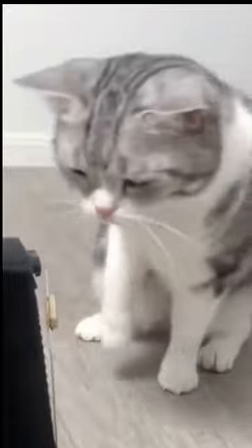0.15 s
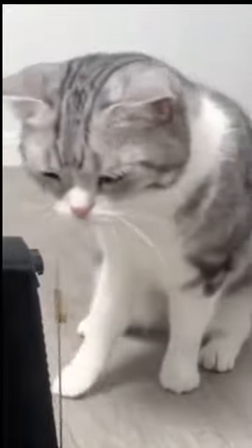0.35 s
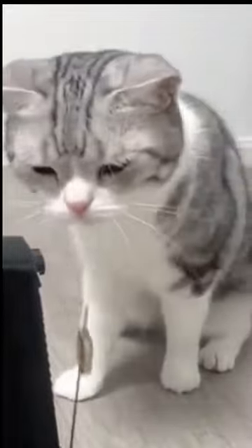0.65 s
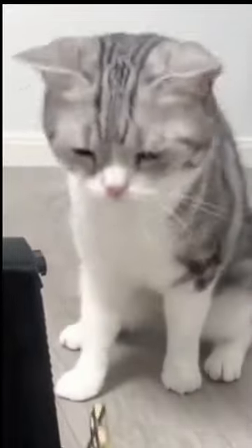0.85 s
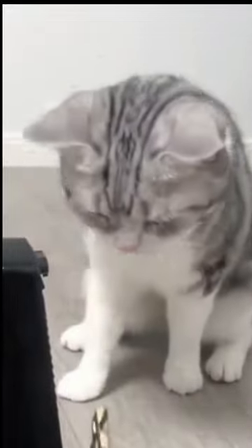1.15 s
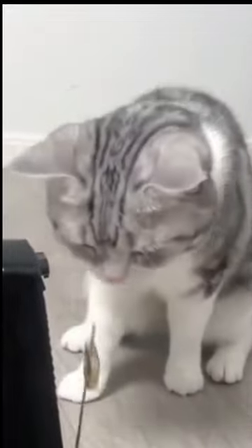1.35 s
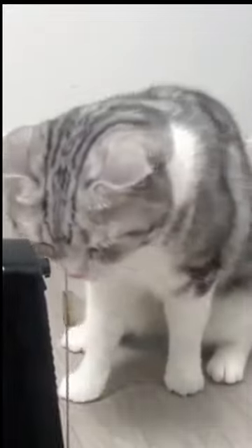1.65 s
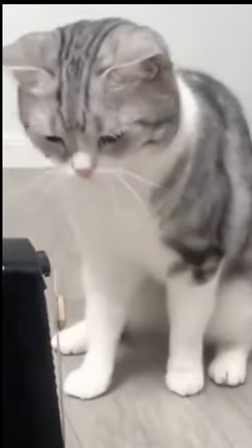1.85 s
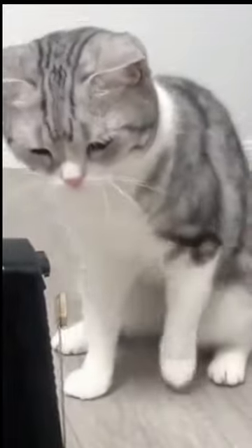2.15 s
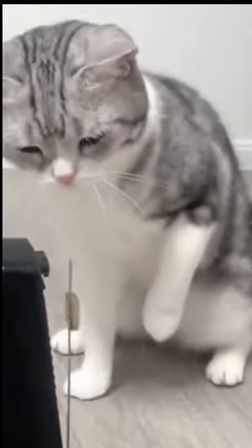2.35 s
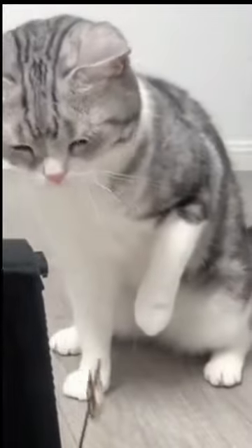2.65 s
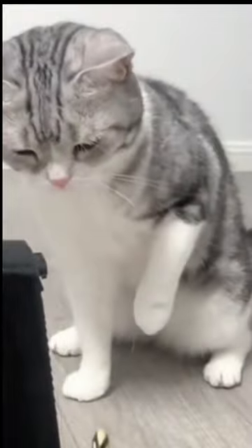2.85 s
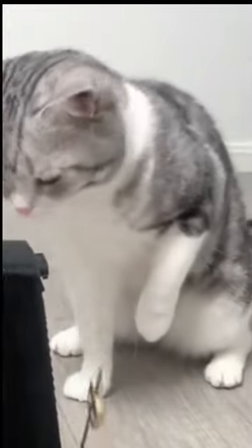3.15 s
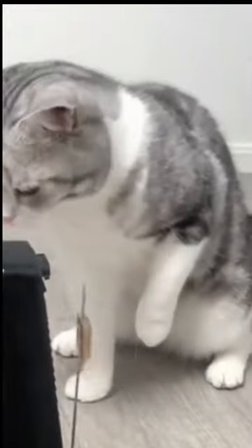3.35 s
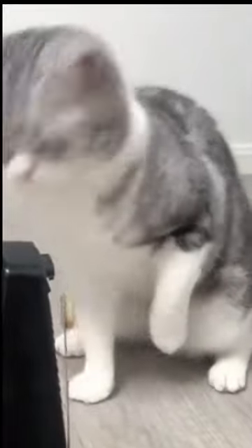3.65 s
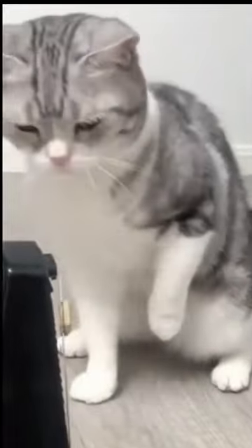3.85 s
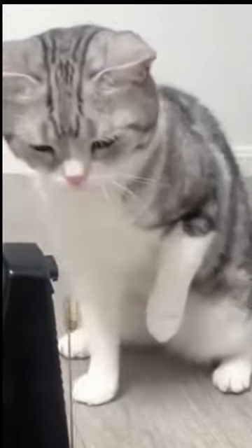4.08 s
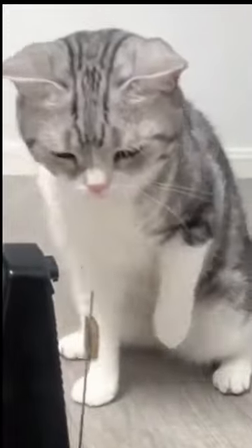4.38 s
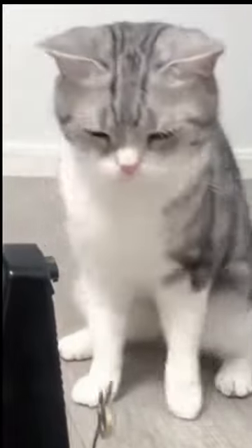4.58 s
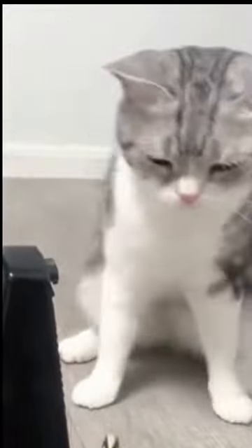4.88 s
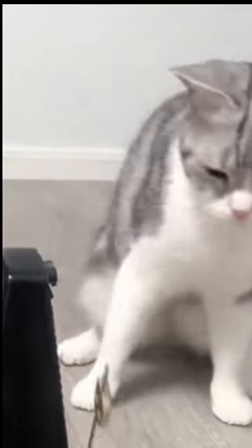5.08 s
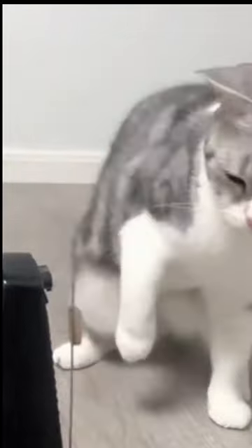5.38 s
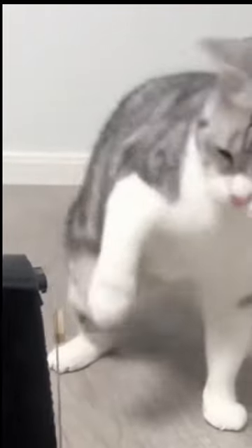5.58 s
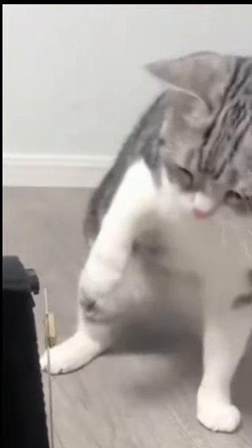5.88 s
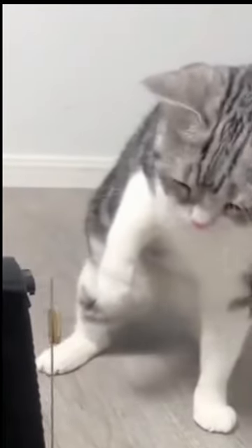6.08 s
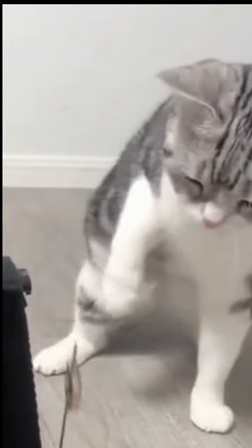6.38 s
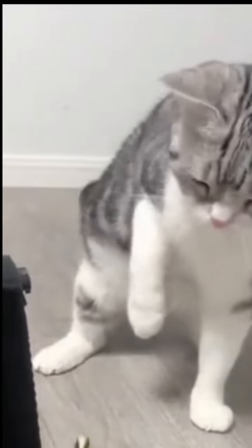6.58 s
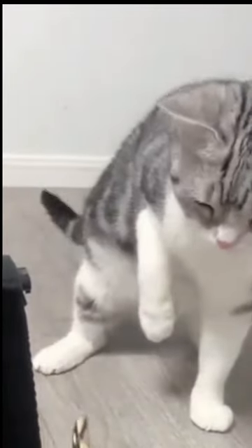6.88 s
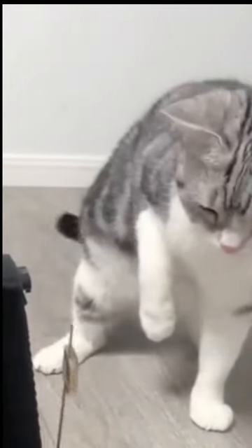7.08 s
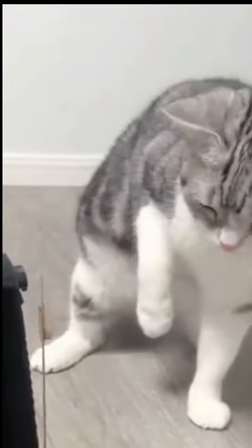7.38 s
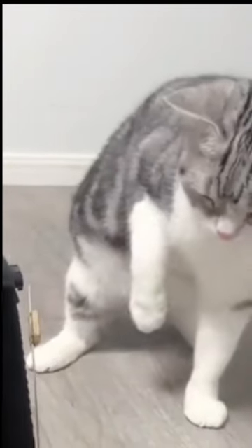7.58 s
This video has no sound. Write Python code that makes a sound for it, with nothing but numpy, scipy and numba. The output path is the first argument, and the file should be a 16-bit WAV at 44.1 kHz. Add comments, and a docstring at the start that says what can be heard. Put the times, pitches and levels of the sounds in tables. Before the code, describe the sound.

A mechanical metronome clacks slowly, about one beat per second, very close in a small hard room, with low drone and thin buzz swelling between beats.

```python
"""In a small hard room, a mechanical metronome ticks on the floor, very close to a phone.
Each beat is a short slide, a noisy crack, a knock of ringing case tones and a room echo; brightness varies.
The phone's gain control ducks after each beat, then lets low drone, air noise and a thin buzz swell back.
A cat beside it shifts its paws now and then, as soft dull bursts of noise, and one faint tap is heard."""
import sys
import numpy as np
from scipy import signal
from scipy.fft import rfft, irfft, next_fast_len
from scipy.io import wavfile
from scipy.ndimage import uniform_filter1d
from numba import njit

SR = 44100
rng = np.random.default_rng(int(sys.argv[2]) if len(sys.argv) > 2 else 0)


def master(y):
    """Save y as 16-bit WAV."""
    cut = np.clip(np.atleast_2d(y).T, -1, 1)
    pcm = np.round(cut * 32767)  # scale
    wavfile.write(sys.argv[1], SR, pcm.astype(np.int16))


N = 340893  # length of the scene in samples
AFTER = np.arange(SR) / SR  # the second that follows a blow, in seconds

# The colour of the escapement's noise. Each row: frequency in Hz, relative level in dB per Hz.
CRACK_COLOUR = [(300, -4), (1000, -23), (2800, -4.5), (3700, 10.5), (4800, 0.5), (6800, 3.5), (8200, -4),
                (11500, -1), (15500, -6.5)]


def undb(db):
    """Turn decibels into a gain."""
    return 10 ** (np.asarray(db) / 20)


def unit(x):
    """Scale a sound to a standard deviation of 1."""
    return x / np.std(x)


def along(points, hz):
    """Read a value between (Hz, value) points, on a logarithmic frequency axis."""
    point_hz, value = np.transpose(points)
    return np.interp(np.log(hz + 1e-3), np.log(point_hz), value)


def noise(colour, size):
    """Coloured noise: random samples whose frequencies are weighted, scaled to level 1."""
    hz = np.fft.rfftfreq(size, 1 / SR)
    spectrum = rfft(rng.standard_normal(size)) * undb(along(colour, hz))
    return unit(irfft(spectrum, size))


def resonate(x, hz, width):
    """A two-pole resonance, with gain 1 at its centre."""
    b, a = signal.iirpeak(min(hz, 0.45 * SR), hz / width, fs=SR)
    return signal.lfilter(b, a, x)


def treble(x, edge_hz, order):
    """Keep what lies above the edge."""
    return signal.sosfilt(signal.butter(order, edge_hz, "high", fs=SR, output="sos"), x)


def fade(t60):
    """Exponential decay after a blow, falling 60 dB in t60 seconds."""
    return np.exp(-np.log(1000) * AFTER / t60)


def swell(peak_s, sharpness):
    """The envelope of a vibration that builds up to 1 and dies away."""
    u = AFTER / peak_s
    return (u * np.exp(1 - u)) ** sharpness


def add(out, s, x):
    """Mix x into out from time s in seconds."""
    i = max(int(s * SR), 0)
    out[i:i + len(x)] += x[:len(out) - i]


def waver(per_s):
    """Slow chance of spread 1: random levels, each gliding into the next."""
    hold = int(SR / max(per_s, 0.5))
    levels = np.repeat(rng.standard_normal(N // hold + 1), hold)
    return unit(uniform_filter1d(levels, hold)[:N])


def drone(level_db=-23, waver_db=0.36, waver_per_s=3.04, steadiness=0.55):
    """Low room resonances, kept going by some distant machine; they waver less than free noise would."""
    # Each row: frequency in Hz, half the width of each filter in Hz, relative level in dB.
    low_bands = [(70.2, 2.7, -2), (100.4, 7.9, -6.5), (198.7, 7.7, -9.5)]
    out = 0
    for hz, half_width, db in low_bands:
        once = resonate(rng.standard_normal(N), hz, 2 * half_width)
        band = unit(resonate(once, hz, 2 * half_width))
        envelope = np.abs(signal.hilbert(band, next_fast_len(N))[:N])
        steadied = band / (envelope + 0.1) ** min(steadiness, 1)  # evens out the swells
        out = out + undb(db) * unit(steadied)
    return unit(out) * undb(level_db + waver_db * waver(waver_per_s))


def buzz(rate_hz=200, buzz_db=-35.0, uneven_db=2.5):
    """Electrical buzz: strictly timed little spikes of uneven size excite several resonances."""
    # Each row: frequency in Hz, width in Hz, relative level in dB.
    peaks = [(2340, 260, 4.5), (2865, 380, 6), (3970, 256, 2.5), (5640, 1000, -13), (7270, 243, 1),
             (14000, 3500, -26)]
    at = np.arange(0, N - 2, SR / rate_hz)
    size = undb(uneven_db * rng.standard_normal(len(at)))
    spikes = np.zeros(2 * N)  # twice the sample rate places them more finely
    spikes[np.round(2 * at).astype(int)] = size
    spikes = signal.resample_poly(spikes, 1, 2)
    ringing = sum(undb(db) * resonate(spikes, hz, width) for hz, width, db in peaks)
    return undb(buzz_db) * unit(ringing)


def air(air_db=-21):
    """Air noise: a steady random hiss and rumble."""
    # Each row: frequency in Hz, relative level in dB per Hz.
    air_colour = [(25, -35), (36, -8), (46, 2), (140, 6), (175, 0.5), (270, 1), (420, -3), (700, 0.5),
                  (1250, -1.5), (2000, -12), (4300, -21.5), (4600, -24.5), (9000, -29), (9600, -33.5),
                  (15500, -33.5)]
    return undb(air_db) * noise(air_colour, size=N)


def shuffles(relative_width=1.1):
    """The cat's paws and fur brush the floor: noise swells and eases with the pressure."""
    # Each row: middle in seconds, half length in seconds, level in dB, centre frequency in Hz.
    moves = [(0.08, .025, -21, 110), (1.95, 0.058, -19, 84), (2.823, 0.052, -26.5, 149),
             (3.798, 0.05, -22, 280)]
    # The soft, dull rubbing. Each row: frequency in Hz, relative level in dB per Hz.
    paw_colour = [(30, -23), (60, 11), (120, 5), (260, -6), (600, -6), (1500, -33), (5000, -52)]
    time = np.arange(N) / SR
    out, rubbing = np.zeros(N), noise(paw_colour, size=N)
    for s, half, db, hz in moves:
        pressure = undb(db) * np.exp(-0.5 * ((time - s) / half) ** 2)
        out += pressure * unit(resonate(rubbing, hz, relative_width * hz))
    return out


def slide(slide_db=-20, slide_t60=0.023):
    """The tooth slides off its pallet: 20 ms of noise that grows toward the blow."""
    lead = SR // 50
    growth = fade(slide_t60)[:lead][::-1]  # a decay turned backwards
    return undb(slide_db) * noise(CRACK_COLOUR, size=lead) * growth


def crack(crack_db=4, crack_t60=0.046):
    """The escapement tooth lands: a burst of noise that dies at once."""
    return undb(crack_db) * noise(CRACK_COLOUR, size=SR) * fade(crack_t60)


def knock(sharpness=2.97, case_db=3, scatter_db=2.05):
    """The case rings: small stiff parts answer at once, the hollow body late."""
    # Each row: usual frequency in Hz, usual relative level in dB, time to swell to the peak in seconds.
    case_tones = [(319, -16.5, 0.02), (362, -6, 0.015), (712.2, -3, 0.0064), (838, 0, 0.0058),
                  (1060, -4.5, 0.0071), (1216, -2, 0.0027), (1419, -1, 0.0069), (2011, 0, 0.0047),
                  (2235, -1, 0.0036), (2470, -5, 0.0023), (3436, 1, 0.0038), (3746, 1.5, 0.0036),
                  (4095, -2.5, 0.0038), (5090, -7, 0.0045), (6620, -8.5, 0.0044), (7920, -10, 0.0039),
                  (9160, -2.5, 0.00049), (11360, -1, 0.0014)]
    chance = rng.standard_normal((len(case_tones), 2))
    out = 0
    for k, ((hz, db, peak_s), (size, detune)) in enumerate(zip(case_tones, chance)):
        heard_hz = hz * (1 + 0.003 * detune)
        mode = np.sin(2 * np.pi * heard_hz * AFTER) * swell(peak_s, sharpness)
        direction = (-1) ** k  # neighbouring modes swing opposite ways
        out = out + direction * undb(case_db + db + scatter_db * size) * mode
    return out


def thump(hz=590, thump_db=8, arrives_s=0.00661, spread_s=0.0012):
    """The hollow body gives one short, deep knock just after the crack."""
    t = AFTER - arrives_s
    return undb(thump_db) * np.sin(2 * np.pi * hz * t) * np.exp(-0.5 * (t / spread_s) ** 2)


def rebound(blow, delay_s=0.0112, edge_hz=3200, first_db=-7, cluster_db=-9, cluster_t60=0.016):
    """The escapement bounces and strikes again a moment later: the bright part of the blow returns, with a
    short cluster of reflections."""
    bright = treble(blow, edge_hz, order=2)
    cluster = rng.standard_normal(SR) * fade(cluster_t60)
    scattered = signal.fftconvolve(bright, cluster / np.linalg.norm(cluster))[:SR]
    out = np.zeros(SR)
    add(out, delay_s, undb(first_db) * bright + undb(cluster_db) * scattered)
    return out


def diffuse():
    """Dense reflections as noise; each octave dies at its own rate."""
    # The colour of the reflections. Each row: frequency in Hz, relative level in dB per Hz.
    tail_colour = [(100, -91), (250, -5), (350, -2), (550, -4), (900, 0.5), (1400, -4), (1750, -5),
                   (2250, -4.5), (2950, -14), (3600, -6), (4700, -16), (7000, -18), (11500, -21.5),
                   (15500, -28)]
    # How long the room rings. Each row: frequency in Hz, time to fall by 60 dB in seconds.
    decay_times = [(150, 0.21), (400, 0.38), (1000, 0.6), (3500, 0.65), (7000, 0.46), (14000, 0.4)]
    hz = np.fft.rfftfreq(SR, 1 / SR)
    spectrum = rfft(noise(tail_colour, size=SR))
    centres = 125 * 2.0 ** np.arange(8)  # octaves, in Hz
    out = 0
    for centre, row in zip(centres, np.eye(len(centres))):
        share = np.interp(np.log(hz + 1), np.log(centres), row)  # bands overlap and add up to 1
        out = out + irfft(spectrum * share, SR) * fade(along(decay_times, centre))
    return out


def room(diffuse_db=-2, diffuse_build_s=0.0061, ring_db=-11, ring_t60=0.54, ring_build_s=0.0071):
    """The room's answer to a beat, alike every time since the metronome stays put."""
    # Lingering tones of case and room. Each row: frequency in Hz, relative level in dB.
    ring_tones = [(326, -9), (388, -5.5), (689, -3), (778, -8), (846, 2.5), (876, 0.5), (912, 2), (937, 4),
                  (1014, 4.5), (1168, 0.5), (1265, 2), (1379, 0), (1440, -1), (1585, 0), (1825, -6),
                  (2042, -4.5), (2218, -5), (2340, -8), (2800, -8.5), (3433, -6), (3452, -3.5), (4047, -7),
                  (4130, -10), (4701, -11), (6305, -17)]
    ring = sum(undb(db) * np.sin(2 * np.pi * (hz * AFTER + rng.random())) for hz, db in ring_tones)
    ring = undb(ring_db) * ring * fade(ring_t60) * (1 - np.exp(-AFTER / ring_build_s))
    return ring + undb(diffuse_db) * diffuse() * (1 - np.exp(-AFTER / diffuse_build_s))


def metronome(fresh_db=-10, bright_hz=3500):
    """Every beat: the tooth slides off its pallet, lands, and shakes case and room."""
    # Each row: start in seconds, strength in dB, treble boost in dB.
    beats = [(0.1074, 0.5, 2.5), (1.0099, 0.5, 0), (2.0028, 0, 1), (2.9070, 0.5, -0.5), (3.9052, 0.15, 1.5),
             (4.807, 2, -3), (5.8062, -0.5, 1.5), (6.7019, 1, -0.5), (7.7083, -2, -1.5)]
    out, answer = np.zeros(N), room()
    for s, db, bright_db in beats:
        before = slide()
        add(out, s - len(before) / SR, before)
        blow = knock() + crack()
        # no two blows are quite alike, so part of the reverberation is new each time
        beat = blow + thump() + rebound(blow) + answer + undb(fresh_db) * diffuse()
        # one pallet strikes harder-edged than the other
        beat = beat + (undb(bright_db) - 1) * treble(beat, bright_hz, order=1)
        add(out, s, undb(db) * beat)
    return out


def taps():
    """A small, short, high tap: resonant noise that swells and dies within milliseconds."""
    # Each row: start in seconds, frequency in Hz, width of each of two filters in Hz, level in dB.
    touches = [(2.7532, 2500, 1090, -14.5)]
    out = np.zeros(N)
    for s, hz, width, db in touches:
        once = resonate(rng.standard_normal(SR), hz, width)
        grain = unit(resonate(once, hz, width))
        add(out, s, undb(db) * grain * swell(peak_s=0.0019, sharpness=1.5))
    return out


def scene():
    """The metronome, the tap and the cat over the steady background of the room, as one channel."""
    background = drone() + buzz() + air()
    return (background + shuffles() + metronome() + taps())[None]


@njit
def follow(x, start, attack, release):
    """Level detector: climbs quickly on peaks, sinks at a steady rate in dB."""
    out, level = np.empty(len(x)), start
    for i in range(len(x)):
        level = level * release + attack * max(abs(x[i]) - level, 0.)
        out[i] = level
    return out


def record(dry, target=0.82, start_level=0.95, attack_s=0.0039, recover_db_per_s=12, ceiling=0.98,
           top_hz=15500):
    """Gain control reacts too late for each beat, so its first milliseconds clip; the top is cut."""
    attack = 1 / (attack_s * SR)
    release = float(undb(-recover_db_per_s / SR))
    held = follow(dry[0], float(start_level), attack, release)
    loud = np.clip(dry * target / held, -ceiling, ceiling)
    low_pass = signal.ellip(10, 0.1, 70, top_hz, fs=SR, output="sos")  # 0.1 dB ripple, 70 dB cut
    return signal.sosfilt(low_pass, loud)


dry = scene()
out = record(dry)
master(out)
```